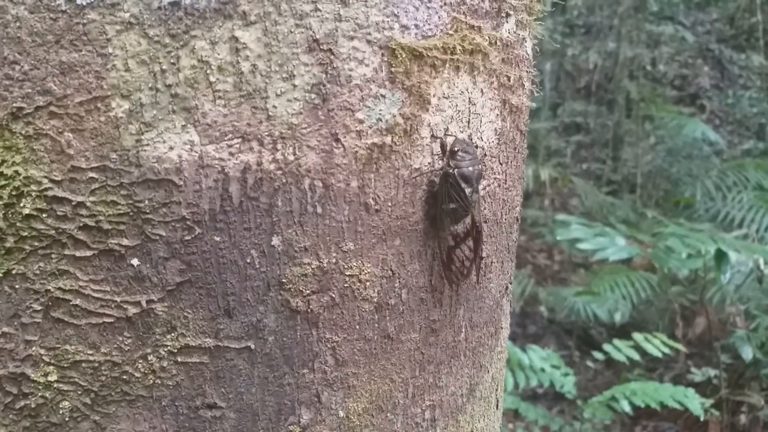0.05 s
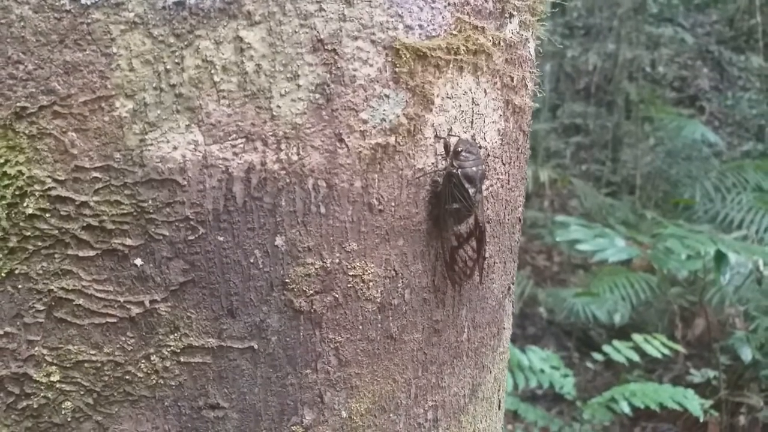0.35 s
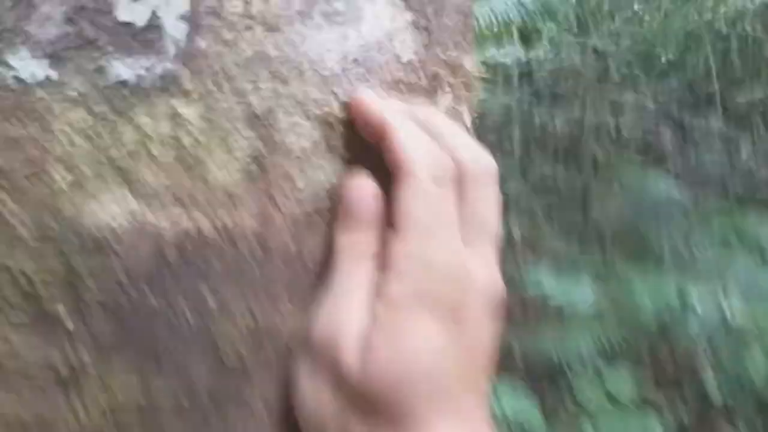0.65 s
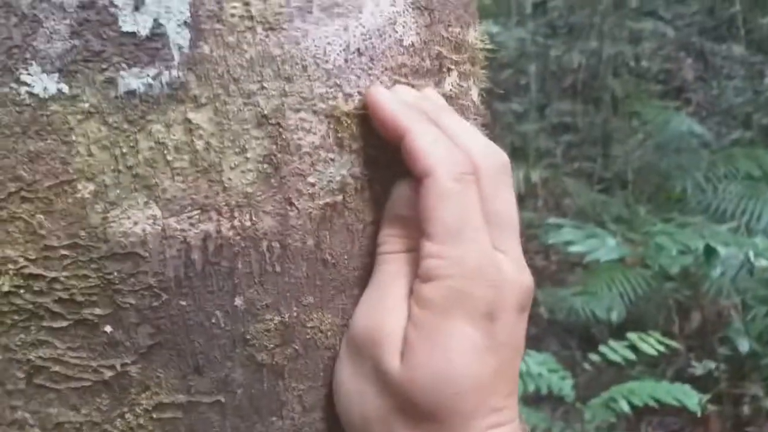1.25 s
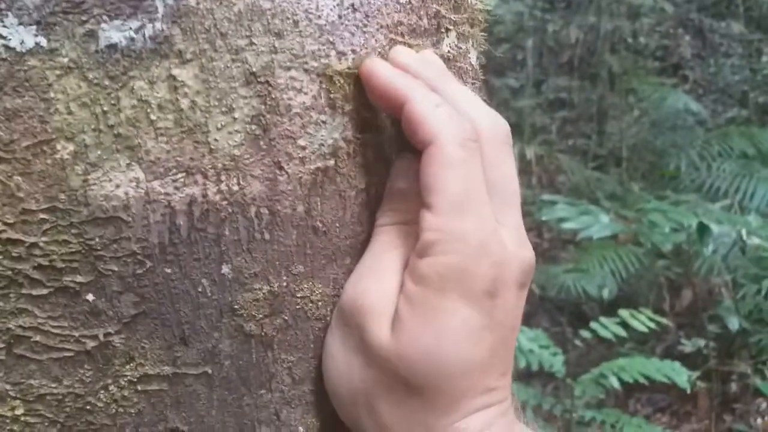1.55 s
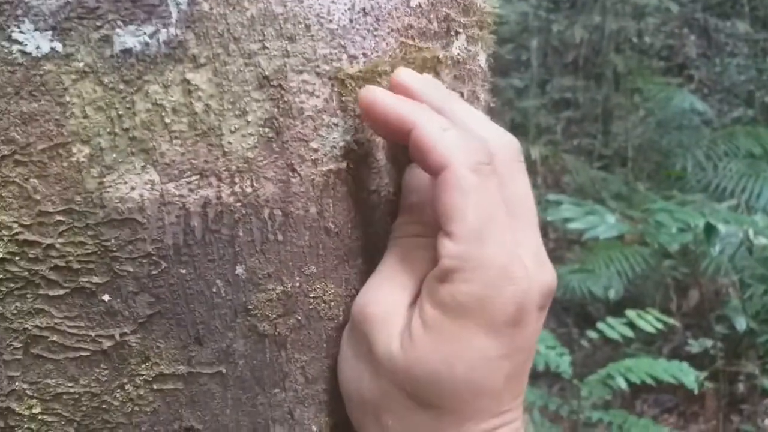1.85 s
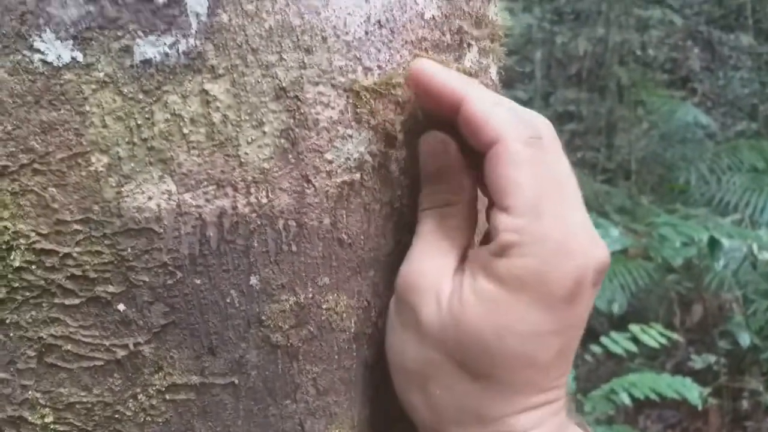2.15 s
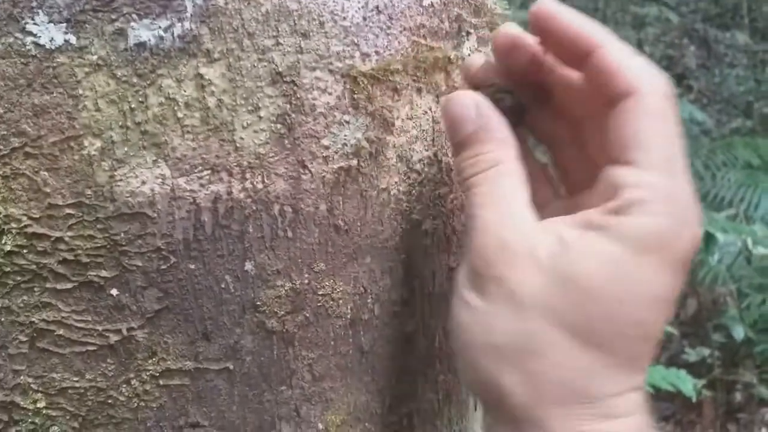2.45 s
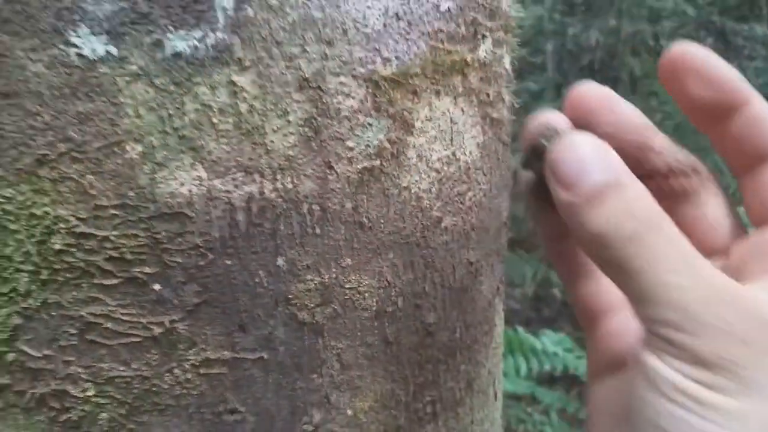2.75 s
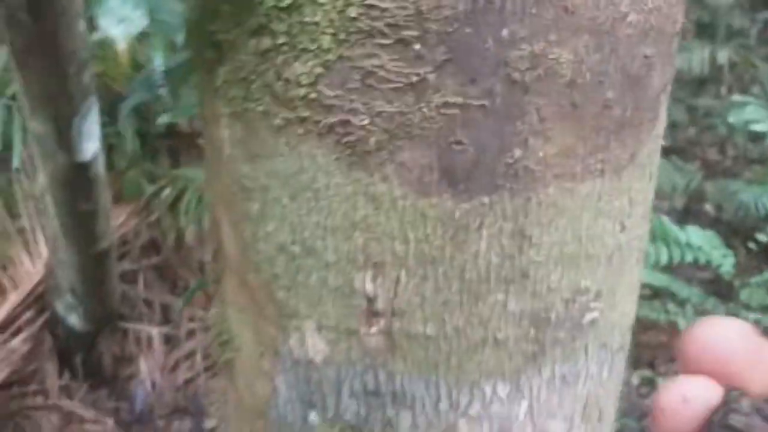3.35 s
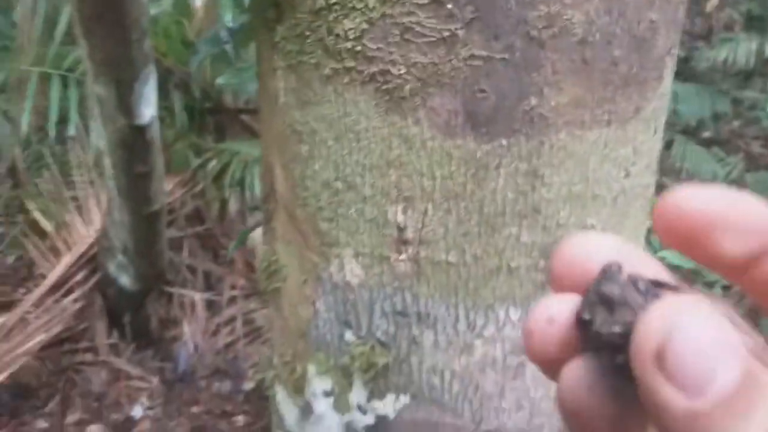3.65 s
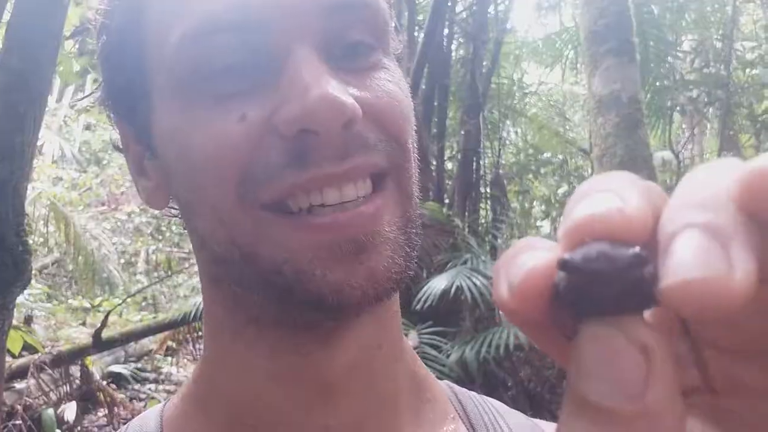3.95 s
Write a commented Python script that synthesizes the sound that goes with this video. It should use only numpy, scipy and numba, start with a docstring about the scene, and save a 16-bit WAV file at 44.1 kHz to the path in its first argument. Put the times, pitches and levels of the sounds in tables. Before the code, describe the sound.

The shrill, rasping buzz of a caught cicada follows a faint forest insect drone and a quick slap on bark. Very close, it begins under a cupped hand, then grows louder, breaking briefly and rattling the microphone.

```python
"""In a forest where cicadas drone far off, a hand claps over one cicada on a tree trunk.
The trapped insect screeches: its two tymbals buckle in turn and snap back about a hundred times a
second, and each impulse excites the resonance of its hollow abdomen. The cavity of the hand colours
the sound as the fingers close and open; the buzz stutters, then speeds up. Out in the open it
overloads the microphone, whose nonlinearity adds a low rattle."""
import sys
import numpy as np
from scipy import signal
from scipy.fft import rfft, irfft
from scipy.io import wavfile
from scipy.ndimage import uniform_filter1d, minimum_filter1d
from numba import njit

SR = 44100
rng = np.random.default_rng(int(sys.argv[2]) if len(sys.argv) > 2 else 0)


def dump_mix(stems):
    """Bounce the given channels to the path in sys.argv[1] as a 16-bit WAV at rate SR."""
    frames = np.atleast_2d(stems).T  # one column per channel
    limited = np.clip(frames, -1, 1)  # hard clip at full scale
    pcm = np.round(limited * 32767).astype(np.int16)
    wavfile.write(sys.argv[1], SR, pcm)


N = 176400

# Bouts of buzzing between the stutters. Each row: start in seconds, end in seconds.
BUZZ_BOUTS = [(.559, 2.019), (2.05, 2.133), (2.14, 2.26), (2.267, 2.298), (2.304, 2.408), (2.415, 2.436),
              (2.445, 2.8), (2.808, 2.892), (2.9, 2.984), (2.991, 3.42), (3.43, 3.578), (3.586, 3.627),
              (3.639, 3.68), (3.693, 3.869), (3.876, 4.0)]


def from_db(db):
    """Amplitude grows tenfold with every 20 dB."""
    return 10 ** (np.asarray(db) / 20)


def rms_one(x):
    """Division by the RMS value gives unit power."""
    return x / np.sqrt(np.mean(x ** 2) + 1e-20)


def at_time(rows, t):
    """Linear interpolation gives the columns of a curve at times t."""
    s, *columns = np.transpose(rows)
    return [np.interp(t, s, c) for c in columns]


def shaped(x, gain_at):
    """Zero-phase filtering multiplies the spectrum by a real function of frequency."""
    hz = np.arange(N + 1) * SR / (2 * N) + 1
    return irfft(rfft(x, 2 * N) * gain_at(hz))[:N]


def coloured(x, points):
    """A spectral envelope of (Hz, dB) points filters x, falling steeply beyond its ends."""
    hz, db = np.transpose(points)

    def envelope(f):
        skirt = np.minimum(1, np.minimum(f / hz[0], hz[-1] / f)) ** 6
        return from_db(np.interp(np.log(f), np.log(hz), db)) * skirt
    return shaped(x, envelope)


def noise(points):
    """Filtering white noise gives coloured noise, here of unit power."""
    return rms_one(coloured(rng.standard_normal(N), points))


def drift(t, per_s):
    """Band-limited interpolation of random values gives a smooth wander of spread about 1."""
    knots = rng.standard_normal(256)
    return np.interp(t * per_s * 16, np.arange(4096), signal.resample(knots, 4096))


def clicks(s, gain):
    """Eightfold oversampling places impulses between samples."""
    fine = np.bincount(np.maximum(s * SR * 8, 0).astype(int), gain, 8 * N)[:8 * N]
    return signal.resample_poly(fine, 1, 8) * 8 + 1e-18


def resonate(x, hz, width_hz):
    """A damped two-pole resonator has unit gain at its peak."""
    r = np.exp(-np.pi * width_hz / SR)
    feedback = [1, -2 * r * np.cos(2 * np.pi * hz / SR), r * r]
    return signal.lfilter(np.array([1, 0, -1]) * (1 - r * r) / 2, feedback, x)


def reverb(x, t60):
    """A diffuse field acts as convolution with exponentially decaying noise of unit energy."""
    t = np.arange(SR) / SR
    tail = rng.standard_normal(SR) * from_db(-60 * t / t60)
    return signal.fftconvolve(x, tail / np.linalg.norm(tail))[:N]


def bursts(rows, spectrum):
    """Brief contacts excite noise that rises linearly and decays exponentially."""
    t, envelope = np.arange(N) / SR, 0
    for start, db, attack, t60 in rows:
        rise = np.clip((t - start) / attack, 0, 1)
        envelope += rise * from_db(db - 60 * np.maximum(t - start - attack, 0) / t60)
    return noise(spectrum) * envelope


def forest():
    """Far cicadas add incoherently into two steady noise bands over still air and faint hiss."""
    # Spectra of chorus and air. Each row: frequency in Hz, relative level in dB.
    chorus = [(2060, -103), (3500, -36.5), (4000, -26), (4280, -9), (4530, -0.5), (4900, -3), (5400, -28),
              (5850, -33), (6410, -4), (6860, 4.5), (7640, -6), (8310, -33), (9500, -42), (12400, -67),
              (20900, -120)]
    air = [(15, -53), (25, -25), (123, -4), (287, -31), (2570, -28), (3500, -37), (4550, -32), (7700, -120)]
    return from_db(-50) * noise(chorus) + from_db(-80) * noise(air) + from_db(-71.5) * rng.standard_normal(N)


def crackles():
    """Wing and bark crackle drily, and just after 0.5 s the hand strikes the bark a second time, loudly: short
    transients have broad spectra."""
    # Each row: start in seconds, level in dB, attack in seconds, 60 dB decay time in seconds.
    contacts = [(.107, -53, .0005, .01), (.272, -66.5, .0005, .01), (.456, -41, .0005, 0.012),
                (.5, -20, 0.00072, 0.016), (.504, -18, 0.00092, 0.0096), (.525, -51, .001, 0.014)]
    # Each row: frequency in Hz, relative level in dB.
    spectrum = [(180, -57), (300, -10), (2000, -27), (3490, -3), (5440, -12), (6000, -24), (7420, 2),
                (10100, -17), (15000, -13)]
    return bursts(contacts, spectrum)


def hand(t):
    """The hand's geometry sets how enclosed the insect is and how long the echo paths are."""
    # Each row: time in seconds, closure from 0 to 1, path length as a factor.
    poses = [(.56, 0.65, 1.24), (.82, 0.95, 0.97), (1.7, 0.55, 1.17), (2.3, 0.42, 0.948), (3.2, 0.06, 0.79)]
    closed, stretch = at_time(poses, t)
    return np.clip(closed, 0, 1), stretch


def palm(x, t60, patterns=3):
    """Cavity reverberation glides between several patterns and weakens as the hand opens."""
    t = np.arange(N) / SR
    shares = np.array([drift(t, per_s=5) for _ in range(patterns)])
    shares /= np.linalg.norm(shares, axis=0)
    ringing = sum(share * reverb(x, t60) for share in shares)
    closed, _ = hand(t)
    return from_db(-10 + 2 * closed) * ringing


def slaps():
    """The impact of hand on bark excites broadband noise."""
    # Each row: start in seconds, level in dB, attack in seconds, 60 dB decay time in seconds.
    impacts = [(.478, -27.5, 0.0036, 0.033), (.4845, -16, 0.00098, 0.025), (.512, -35, 0.0018, 0.11),
               (2.039, -24, 0.0019, 0.012)]
    # Each row: frequency in Hz, relative level in dB.
    spectrum = [(59, -45), (100, 2.5), (399, -23), (674, 4), (962, -21), (1560, 7.5), (2000, -10),
                (4940, 0.5), (5840, -5), (6220, 2), (7050, -3), (10300, -4.5), (11900, 0), (15000, -7)]
    return bursts(impacts, spectrum)


def knocks():
    """Each dull knock of a finger is a damped low oscillation."""
    # Each row: start in seconds, level in dB, frequency in Hz, 60 dB decay time in seconds.
    taps = [(.486, -39.5, 195, 0.16), (0.625, -44, 300, 0.012), (0.668, -50, 250, 0.018),
            (3.696, -8, 288, 0.022), (3.6976, -4, 700, 0.0033), (3.911, -20, 110, 0.0074)]
    out = 0
    for start, db, hz, t60 in taps:
        age = np.maximum(np.arange(N) / SR - start, 0)
        out -= np.sin(2 * np.pi * hz * age) * from_db(db - 60 * age / t60)
    return signal.sosfilt(signal.butter(2, 70, "high", fs=SR, output="sos"), out)


def stroke_times(lag_cycles):
    """Phase is the integral of the muscle rate; a stroke falls once a cycle, at a wandering lag."""
    # Each row: time in seconds, muscle rate in cycles per second.
    muscle_rate = [(.56, 93), (.68, 100), (1.1, 103), (1.5, 100.5), (2.0, 98.5), (2.6, 97), (2.95, 95.5),
                   (3.25, 96.3), (3.6, 95.5), (3.85, 97), (3.912, 96), (3.924, 130.5)]
    ring_out_s, restart_s = .003, .012
    t, times = np.arange(N) / SR, []
    rate, = at_time(muscle_rate, t)
    lag_cycles = lag_cycles + .0069 * drift(t, per_s=30)
    for start, end in BUZZ_BOUTS:
        on = (t >= start) & (t < end - ring_out_s)
        run_up = 1 - .055 * np.exp((start - t[on]) / restart_s)  # each bout starts a little slow
        turns = np.cumsum(rate[on] * run_up) / SR - lag_cycles[on]
        times.append(np.interp(np.arange(np.ceil(turns[-1])), turns, t[on]))
    return np.concatenate(times)


def scatter(s, gain, decay_s, stretch, count):
    """Multiple arrivals spread each click into a dying cluster whose delays shift slowly."""
    move_s, jitter_s = .00006, .000008
    delays = 2 * decay_s * (np.arange(count) + rng.random(count)) / count
    times = [s + delay * stretch + move_s * drift(s, per_s=3)
             + jitter_s * rng.standard_normal(1000)[:len(s)] for delay in delays]
    weights = rng.choice([-1, 1], count) * np.exp(-delays / decay_s)
    return clicks(np.concatenate(times), np.outer(weights, gain).ravel())


def stroke(lag_cycles, level_db, ring_db):
    """Impulse excitation: once a cycle, ribs crack in turn, echo off the fingers and ring the abdomen."""
    abdomen_hz, spread_db, jitter_s = 6254, .67, .00008
    s = stroke_times(lag_cycles)
    louder, later = rng.standard_normal((1000, 2))[:len(s)].T
    gain = from_db(np.interp(s * SR, np.arange(N), level_db) + spread_db * louder)
    s = s + jitter_s * later
    ribs = from_db(-5) * scatter(s, gain, decay_s=.000432, stretch=1, count=7)
    echoes = from_db(-6.5) * scatter(s, gain, decay_s=.001076, stretch=hand(s)[1], count=14)
    detune = 1 + .0047 * rng.uniform(-1.5, 1)
    ring = resonate(clicks(s, gain), abdomen_hz * detune, width_hz=360)
    ring = resonate(ring, abdomen_hz, width_hz=3500)  # the tymbal's own broad resonance
    return np.array([ribs + echoes, from_db(ring_db) * ring])


@njit
def bell_filter(x, tuning, damping, gain):
    """Two integrators in a loop form a state-variable filter, retuned at every sample."""
    out, band_state, low_state = np.empty(len(x)), 0., 0.
    for i in range(len(x)):
        g = tuning[i]
        band = (band_state + g * (x[i] - low_state)) / (1 + g * (g + damping[i]))
        low = low_state + g * band
        band_state, low_state = 2 * band - band_state, 2 * low - low_state
        out[i] = x[i] + damping[i] * (gain[i] - 1) * band
    return out


def bell(x, hz, width_hz, db):
    """A moving resonance, or an antiresonance where db is negative."""
    omega, gain = 2 * np.pi * hz / SR, from_db(db)
    damping = 2 * np.pi * width_hz / SR / np.sin(omega) / np.sqrt(gain)
    return bell_filter(x, np.tan(omega / 2), damping, gain)


def hand_cavity(crack):
    """The resonances of the hollow between the fingers move with its shape and colour the cracks."""
    # Colour under the cupped hand and in the open. Each row: frequency in Hz, gain in dB.
    cupped = [(560, -36), (1050, -27.5), (1450, -12), (1900, -9), (2170, -26.5), (2450, 1.5), (3150, -2),
              (3500, 2), (7000, 3), (10000, -3.5), (11500, 2.5), (13400, -7), (15000, -6.5), (16000, -10)]
    uncovered = [(700, -14), (1400, -13), (2500, -4), (5000, 1), (9400, 3), (10400, -2.5), (12100, 1.5),
                 (13400, -5), (15000, -5.5), (16000, -4.5)]
    # Peaks and dips. Each row: time in seconds, centre in Hz, width in Hz, gain in dB.
    low_mode = [(.56, 5270, 1400, 7.5), (.8, 4100, 900, 4), (1.7, 3600, 1020, 5.5), (2.2, 5460, 1210, 2),
                (2.52, 4630, 1110, 21), (2.85, 4520, 1000, 10), (2.94, 4580, 1300, -3.5),
                (3.38, 4560, 1300, -4.5), (3.75, 4800, 1500, 4)]
    mid_mode = [(1.6, 9800, 2000, 0.5), (2.22, 8120, 2820, 17), (2.45, 7300, 2000, -6.5),
                (2.85, 9400, 1500, 2.5), (3.95, 8100, 2500, 6)]
    top_mode = [(.56, 13500, 1300, 8), (.82, 14300, 1200, 2), (1.5, 11500, 1300, 3), (2.48, 12100, 1400, 2),
                (3.2, 12000, 1500, 2), (3.6, 14800, 1490, 7)]
    top_dip = [(2.49, 13500, 1205, 3), (2.55, 11600, 1800, -4), (2.66, 8700, 1800, -12.5),
               (2.88, 7200, 1000, 0)]
    t = np.arange(N) / SR
    closed, _ = hand(t)
    crack = closed * coloured(crack, cupped) + (1 - closed) * coloured(crack, uncovered)
    for curve in (low_mode, mid_mode, top_mode, top_dip):
        crack = bell(crack, *at_time(curve, t))
    return crack


def balance_bands(buzz):
    """Normalising short-time power makes body, ring and treble each follow a level curve in the bouts."""
    # The two crossover frequencies in Hz.
    edges_hz = [5600, 7100]
    # Each row: time in seconds, band level in dB.
    body = [(.57, -24.5), (1.3, -22), (1.8, -23), (2.22, -30), (2.45, -22.5), (2.85, -21.5), (2.95, -23.5),
            (3.4, -26), (3.98, -18.5)]
    ring = [(.57, -33), (.8, -24.5), (2.0, -16), (2.5, -20), (2.85, -18), (2.94, -14), (3.35, -16),
            (3.6, -17.5), (3.98, -14.5)]
    treble = [(.57, -23), (1.3, -23), (1.8, -20.5), (3.3, -20), (3.98, -18)]
    t, span, out = np.arange(N) / SR, SR // 16, 0
    gate = sum((t >= start) & (t < end) for start, end in BUZZ_BOUTS) * 1.
    duty = np.abs(uniform_filter1d(gate, span))
    for edge, level in zip(edges_hz + [SR], (body, ring, treble)):
        band = shaped(buzz, lambda f: 1 / (1 + (f / edge) ** 32))
        buzz = buzz - band
        power = np.abs(uniform_filter1d(band ** 2, span)) + 1e-12
        out += from_db(at_time(level, t)[0]) * band * np.sqrt(duty / power)
    return out


def cicada():
    """Elastic buckling: two tymbals each give way and snap back, making four clicks a cycle."""
    # Each row: time in seconds, lag of the snap back in cycles, relative levels of the second tymbal
    # and of the snap back in dB.
    action = [(.56, 0.51, 4, 3), (.75, .52, 0.5, 1), (1.1, 0.72, 5.5, 0), (1.5, 0.45, 3.5, 4),
              (1.9, 0.57, 2, -6), (2.2, 0.43, -5.5, -5.5), (2.6, 0.46, 0, -7.5), (3.1, 0.51, -3, -9),
              (3.5, 0.3, 5, -6), (3.8, 0.41, -6, -2.5), (3.96, 0.36, 3.5, -28.5)]
    second_lag_cycles, buckle_ring_db, snap_ring_db = .345, 18, -3
    snap_lag, second_db, snap_db = at_time(action, np.arange(N) / SR)
    crack, ring = (stroke(0, np.zeros(N), buckle_ring_db)
                   + stroke(second_lag_cycles, second_db, buckle_ring_db)
                   + stroke(snap_lag, snap_db, snap_ring_db)
                   + stroke(snap_lag + second_lag_cycles, snap_db, snap_ring_db))
    return balance_bands(hand_cavity(crack) + ring)


def rattle(buzz):
    """Square-law distortion in the overdriven microphone rectifies each pulse into an uneven low push."""
    # Each row: time in seconds, relative level in dB.
    level = [(.4, -100), (.58, -61), (1.1, -66.5), (1.7, -67), (1.9, -51.5), (2.39, -50), (2.44, -42),
             (2.55, -34.5), (2.6, -45), (2.82, -37.5), (3.6, -42.5), (3.95, -43)]
    push = -buzz ** 2 * (1 + .81 * noise([(20, 0), (400, 0)]))
    low = signal.sosfilt(signal.butter(1, [168, 1750], "band", fs=SR, output="sos"), push)
    low = signal.sosfilt(signal.butter(4, 2500, fs=SR, output="sos"), low)
    db, = at_time(level, np.arange(N) / SR)
    return from_db(db + .5) * rms_one(low)


def rustle():
    """Friction of the fingers makes a low noise that grows."""
    # Each row: time in seconds, level in dB.
    level = [(.4, -100), (1.7, -71), (2.39, -56), (2.44, -51.5), (3.6, -47)]
    # Each row: frequency in Hz, relative level in dB.
    spectrum = [(40, -30), (95, 4), (250, -4.5), (1200, -7.5)]
    db, = at_time(level, np.arange(N) / SR)
    return from_db(db) * noise(spectrum)


def rubs():
    """Sliding friction of fingers on bark gives two short midrange scrapes."""
    # Each row: start in seconds, level in dB, attack in seconds, 60 dB decay time in seconds.
    slides = [(1.864, -32.5, 0.0027, 0.077), (1.931, -31.5, 0.011, 0.031)]
    # Each row: frequency in Hz, relative level in dB.
    spectrum = [(200, -28), (700, -5), (1100, -11), (1500, 4), (1850, 8), (2200, -12)]
    return bursts(slides, spectrum)


def scene():
    """Superposition: the close insect and hand, almost in mono, with a faint tail from the trees."""
    palm_t60_s, forest_t60_s = .046, .35
    buzz = cicada()
    near = buzz + slaps() + crackles() + rubs()
    reflections = palm(near, palm_t60_s) + from_db(-20) * reverb(near, forest_t60_s)
    mid = near + reflections + rattle(buzz) + rustle() + knocks() + forest()
    side = from_db(-36.5) * reverb(near, palm_t60_s)
    return np.array([mid + side, mid - side])


def record(dry):
    """Fast limiting holds the peaks; a steep low-pass filter cuts the top."""
    span, cutoff_hz = SR // 1000, 15900
    needed = 1 / np.maximum(np.abs(dry).max(axis=0), 1)
    gain = uniform_filter1d(minimum_filter1d(needed, 2 * span), span)
    return np.array([shaped(x, lambda f: 1 / (1 + (f / cutoff_hz) ** 300)) for x in dry * gain])


dry = scene()
out = record(dry)
dump_mix(out)
```